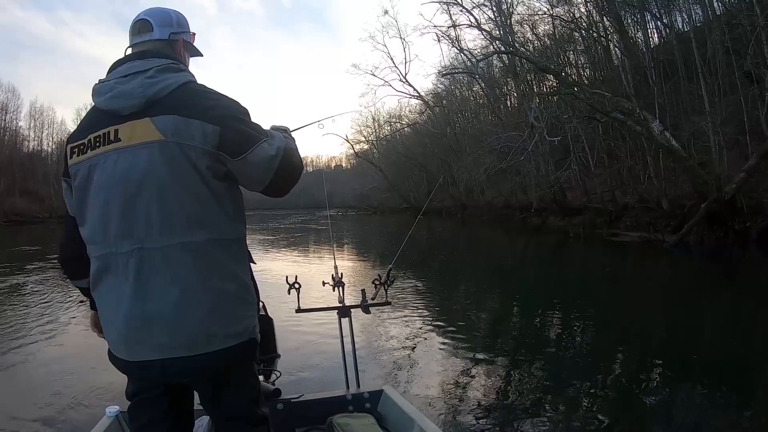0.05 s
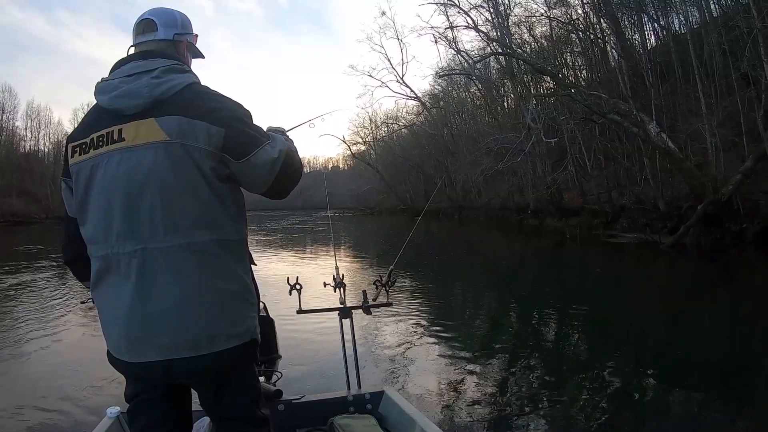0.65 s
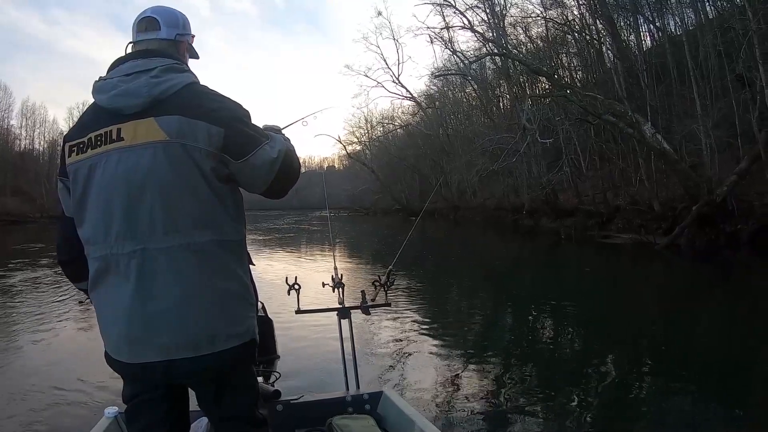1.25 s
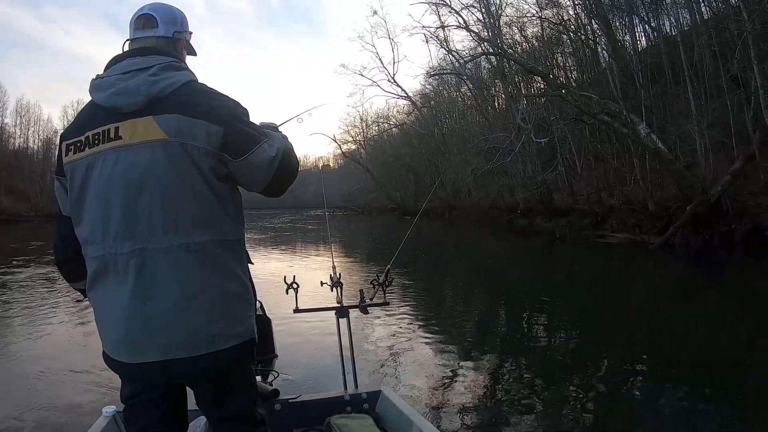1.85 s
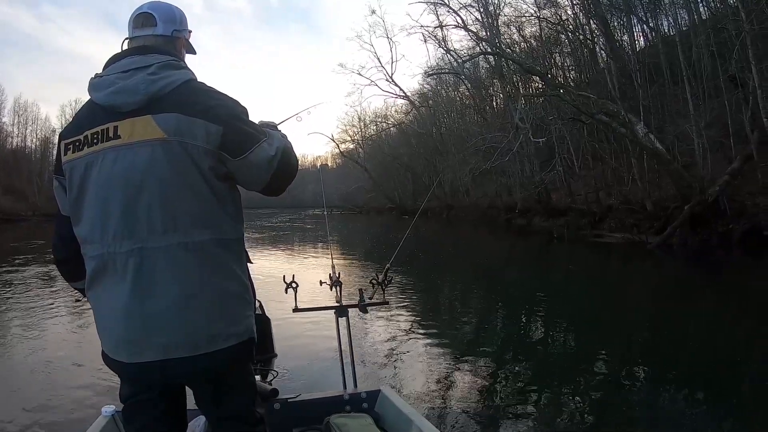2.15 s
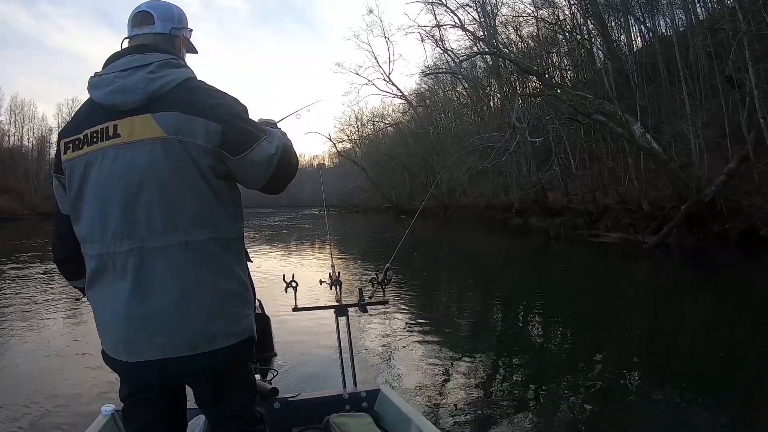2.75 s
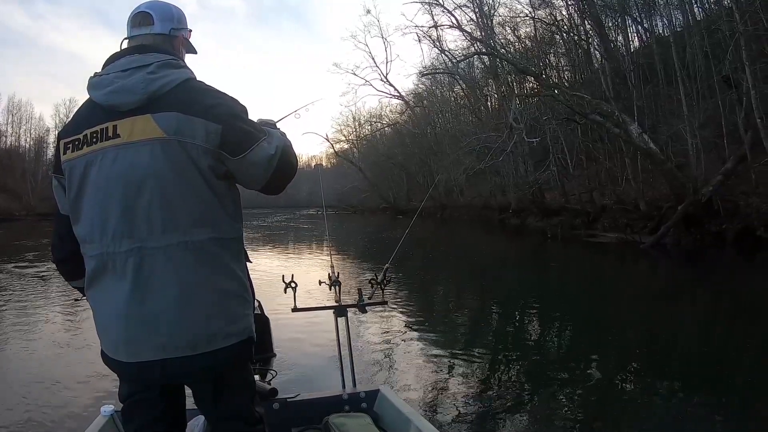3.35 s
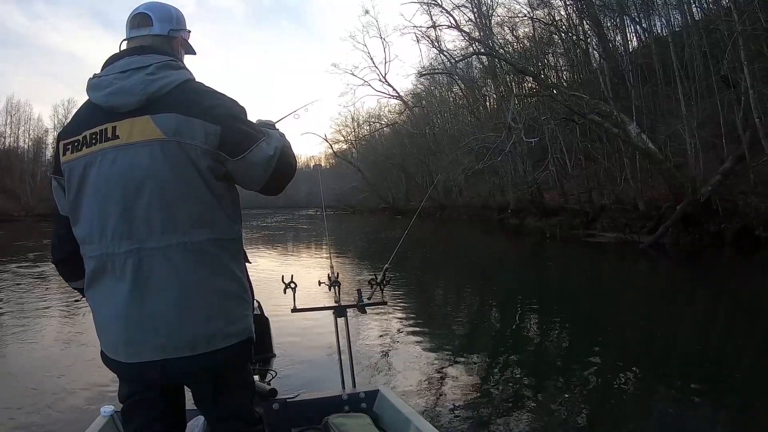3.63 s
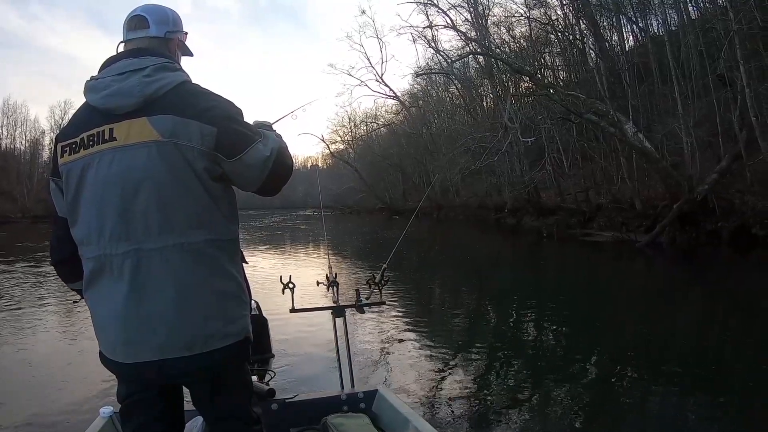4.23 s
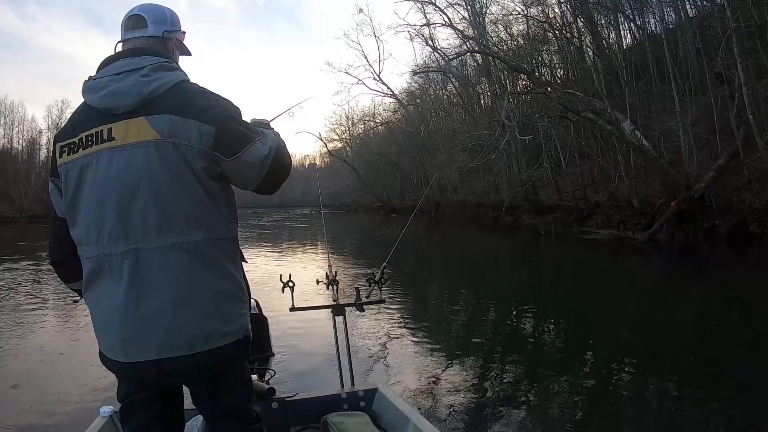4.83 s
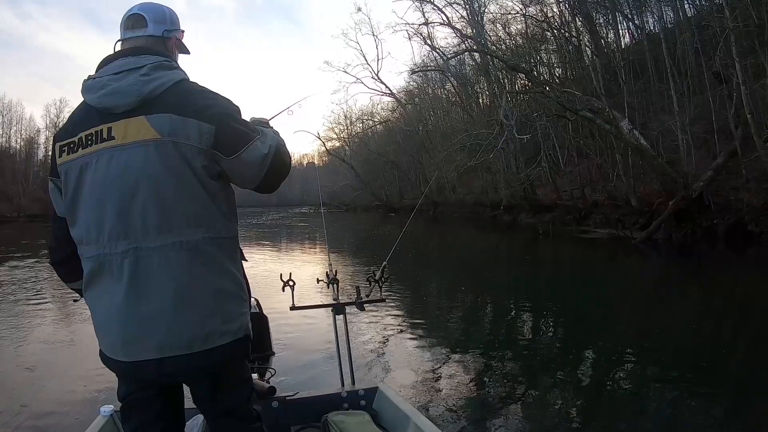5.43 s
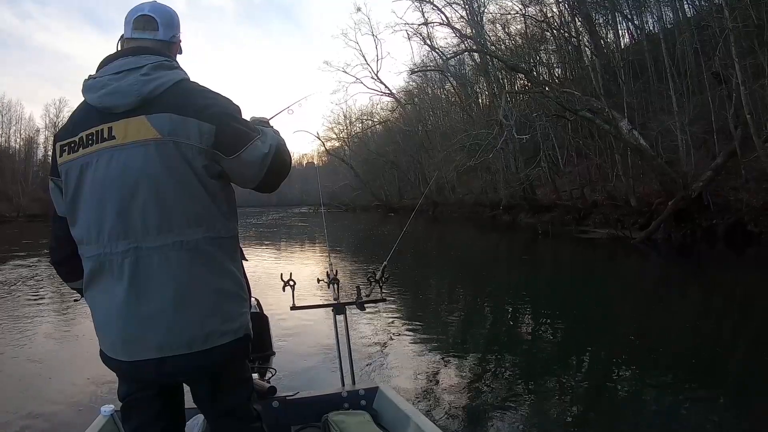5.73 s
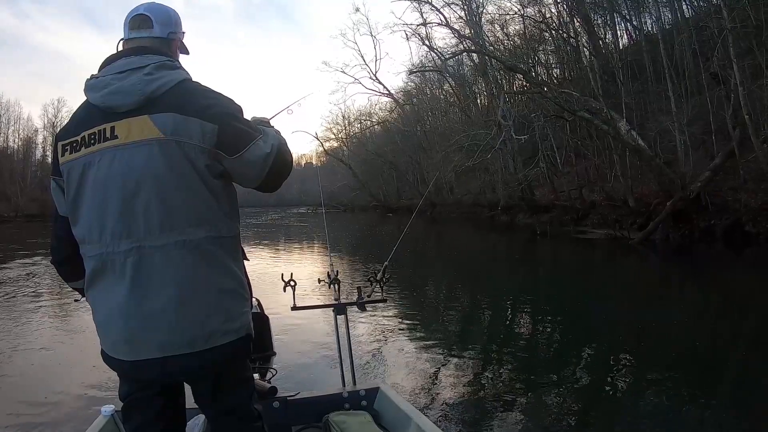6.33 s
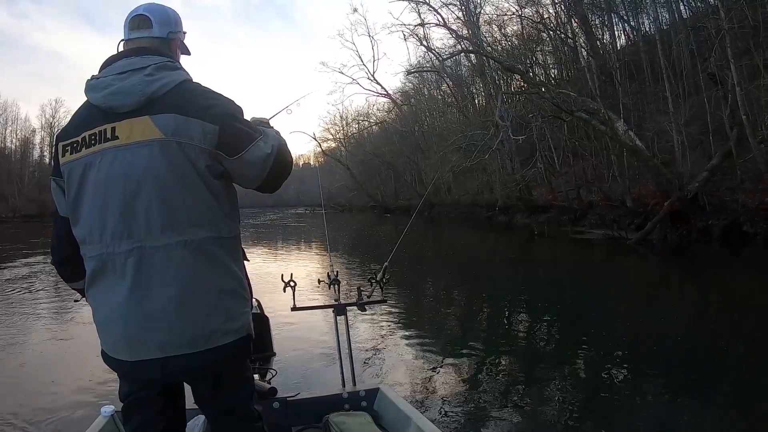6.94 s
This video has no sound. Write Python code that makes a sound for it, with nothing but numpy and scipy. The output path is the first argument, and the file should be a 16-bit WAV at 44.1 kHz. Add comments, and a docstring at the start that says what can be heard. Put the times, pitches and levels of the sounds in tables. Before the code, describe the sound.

Low wind gusts and buffets the microphone on a small boat while a calm river rushes softly. A far engine drones underneath throughout. Fishing line hisses faintly at the start, and small birds whistle, chip and trill from the banks, echoing in the woods. A few tiny bubbles and light dry ticks come close by, and one dull low thump lands near the end.

```python
"""Water rushes softly over a low, gusting wind: a small boat drifts on a calm wooded river.
Current, ripples and wind are shaped noise, and trapped bubbles ring beside the hull.
Small birds whistle, chip and trill on the banks in gliding tones that the bare woods echo.
An angler's line hisses through the rod rings; there are short, dry ticks and one dull low thump.
Underneath, a far engine drones on a few low harmonics of its firing rate."""
import sys
import numpy as np
from scipy import signal
from scipy.io import wavfile
from scipy.ndimage import uniform_filter1d

SR = 44100
rng = np.random.default_rng(int(sys.argv[2]) if len(sys.argv) > 2 else 0)


def wrap_up_sound(samples):
    """Save the sound to the file named by the first command line argument, as 16-bit audio."""
    columns = np.atleast_2d(samples).T
    # keep every value between -1 and 1, then stretch to whole-number steps
    tamed = np.clip(columns, -1, 1)
    steps = np.round(tamed * 32767).astype(np.int16)
    wavfile.write(sys.argv[1], SR, steps)


N = 316638
TIME = np.arange(N) / SR


# Tone of the current: freq_hz, density_db
RUSH_SPECTRUM = [(100, -8), (250, 3), (340, -0.5), (480, -1.5), (580, 0), (800, -2), (1000, -7),
                 (1300, -11.5), (1700, -20.5), (2100, -27), (2600, -37), (4000, -69), (8000, -67)]
# Its fader ride: time_s, level_db
RUSH_LEVEL = [(0, -52), (.8, -51.5), (1.6, -52), (2.4, -51), (3.2, -51.5), (4, -51.5), (4.8, -51),
              (5.3, -50.5), (5.8, -51), (6.5, -51.5), (7.18, -51)]
# Its treble lift: time_s, tilt_db_per_octave
RUSH_TILT = [(0, 1), (1, 0.5), (2, 0.1), (3, -0.5), (4, 1), (4.8, 1.5), (5.7, 2), (6.4, 2), (7.18, 1.5)]
# Tone of the ripples: freq_hz, density_db
RIPPLE_SPECTRUM = [(1500, -14), (2600, 7), (3300, 7.5), (4200, 4.5), (5700, 6), (6500, -1), (7400, -6),
                   (8400, -3), (9600, 0), (10500, -27), (11700, -29)]
# Their fader ride: time_s, level_db
RIPPLE_LEVEL = [(0, -75), (.9, -83.5), (1.32, -80), (1.8, -84.5), (2.4, -83.5), (3.4, -80.5), (5.1, -79.5),
                (5.75, -81.5), (6.5, -82), (7.18, -80)]

def river(rush_trim_db=3, ripple_trim_db=5, swell_db=.27):
    """The dull rush of the current and the fine hiss of ripples."""
    rush_db = at_time(RUSH_LEVEL)[0] + rush_trim_db + swell_db * drift(per_s=3)
    ripple_db = at_time(RIPPLE_LEVEL)[0] + ripple_trim_db
    rush = amp(rush_db) * wash(RUSH_SPECTRUM, tilt=RUSH_TILT)
    return rush + amp(ripple_db) * wash(RIPPLE_SPECTRUM, patchy_db=3, size=512)


# The clearest bubbles, dead centre: start_s, pitch_hz, level_db
PLOPS = [(1.468, 1720, -53), (3.145, 2290, -68), (5.043, 2580, -60)]

def bubbles(count=23, level_db=-67, low_hz=900, high_hz=3000, spread_db=8):
    """Now and then a ripple traps a small bubble beside the hull."""
    faint = []
    for when, pitch, loud, side in rng.random((count, 4)):
        hz = low_hz * (high_hz / low_hz) ** pitch
        faint.append((when * N / SR, hz, level_db + spread_db * (loud - pitch), side))
    out = np.zeros((2, N))
    for s, hz, db, side in faint + [(*row, .5) for row in PLOPS]:
        for channel, share in zip(out, (side, 1 - side)):
            add(channel, s, np.sqrt(share) * amp(db) * bubble(hz))
    return out


def bubble(hz, cycles=14):
    """A trapped bubble rings briefly and rises in pitch."""
    t = np.arange(SR // 12) / SR
    age = t * hz / cycles
    return np.exp(-age) * np.sin(2 * np.pi * hz * t * (1 + .02 * age))


# Tone of the wind's roar: freq_hz, density_db
ROAR_SPECTRUM = [(20, -24.5), (45, -15.5), (68, 4), (92, 4), (110, 0), (125, -3.5), (150, -2), (185, -7.5),
                 (235, -13), (320, -19.5), (600, -78)]
# Strength of the breeze: time_s, level_db
ROAR_LEVEL = [(0, -44.5), (.8, -42.5), (1.2, -43), (2.2, -43.5), (2.8, -40.5), (3.3, -44.5), (4.6, -44),
              (5.2, -42), (6.1, -44), (7.18, -44.5)]
# Puffs (+) and lulls (-): centre_s, half_length_s, lift_db
PUFFS = [(0.05, 0.044, 5.5), (.25, .04, -2), (.46, 0.029, 7), (0.855, 0.028, -6), (1.18, .06, 3),
         (1.732, .04, 8), (2.417, 0.048, -3.5), (2.697, 0.035, 5), (2.847, 0.045, -4.5), (3.48, 0.033, -11),
         (3.874, 0.12, 1.5), (4.19, 0.051, -2), (4.32, 0.044, 3.5), (6.102, 0.027, 3.5),
         (6.253, 0.044, -15), (6.74, .035, 7), (6.825, 0.037, -6), (6.96, 0.059, -9), (7.11, 0.035, 0)]
# Deep buffeting on the microphone: freq_hz, density_db
BUFFET_SPECTRUM = [(5, -25), (15, -4), (25, 5.5), (45, 1.5), (60, 1), (90, -25), (200, -80)]
# Its gusts: time_s, level_db
BUFFET_LEVEL = [(0, -59), (.27, -47), (.65, -53.5), (1.4, -49.5), (1.85, -53), (2.05, -57), (2.25, -49),
                (2.85, -51), (3.27, -44), (3.5, -47), (4.02, -43), (4.2, -56), (4.55, -49), (5.1, -44.5),
                (5.65, -49), (6.1, -44), (6.25, -56), (6.75, -42.5), (6.95, -52), (7.12, -40.5)]
# A hollow band above the roar: freq_hz, density_db
HOLLOW_SPECTRUM = [(120, -44.5), (155, 5), (174, 9.5), (198, 2), (218, -18.5), (260, -50.5)]
# Its fader ride: time_s, level_db
HOLLOW_LEVEL = [(0, -58), (.4, -54.5), (1.0, -50.5), (1.25, -54), (1.6, -51.5), (2.5, -56), (3.2, -53.5),
                (3.9, -58.5), (4.3, -54.5), (4.6, -48), (4.77, -52.5), (4.93, -47.5), (5.25, -55.5),
                (5.6, -53), (5.9, -51), (6.45, -50.5), (6.7, -55.5), (6.95, -48.5), (7.18, -54)]

def wind(swell_db=.5):
    """A low roar swells and puffs with the breeze, between deep buffeting and a hollow upper band."""
    puff_db = sum(db * np.exp(-((TIME - s) / width) ** 2) for s, width, db in PUFFS)
    roar_db = at_time(ROAR_LEVEL)[0] + puff_db + swell_db * drift(per_s=5.1)
    roar = amp(roar_db) * wash(ROAR_SPECTRUM, size=4096)
    buffet = amp(at_time(BUFFET_LEVEL)[0]) * wash(BUFFET_SPECTRUM, size=4096)
    hollow = amp(at_time(HOLLOW_LEVEL)[0]) * wash(HOLLOW_SPECTRUM, size=4096)
    return roar + buffet + hollow


# The whistler's pickup notes: start_s, length_s, first_hz, last_hz, level_db, rasp_share
OPENERS = [(0.021, 0.027, 3900, 3990, -63.5, 0.15), (2.7, .012, 3350, 3430, -71, .1),
           (2.721, 0.012, 3710, 3750, -65, 0), (2.737, 0.015, 3850, 3840, -68, 0.08),
           (5.592, 0.05, 2740, 2600, -71, 0.4), (5.603, .017, 5680, 4190, -72, 0.2),
           (5.612, 0.01, 4440, 5170, -73, .2), (5.621, 0.016, 3870, 4600, -69.5, 0.3),
           (5.638, 0.027, 3810, 3300, -64, .2)]
# Its falling slurs: start_s, length_s, first_hz, level_db, rasp_share, break_db
SLURS = [(.064, .094, 3830, -64.5, .15, -4), (2.769, 0.084, 3853, -62.5, 0.15, -5),
         (5.657, .104, 3950, -62, .08, -4)]
# It turns towards the boat: time_s, direct_lift_db
FACING = [(.1, -2), (2.8, 0), (5.6, 3.5)]

def whistler(fall_hz_per_s=12200, bow_hz=70, opener_direct_db=-1.5):
    """Short notes lead into a bowed slur that breaks and fades as it falls; the woods ring on."""
    openers = bird([(s, arc(length, first, last), db, rasp)
                    for s, length, first, last, db, rasp in OPENERS], soft=.52)
    slurs = np.zeros(N)
    for s, length, hz, db, rasp, break_db in SLURS:
        fall_hz = fall_hz_per_s * length
        path = arc(length, hz, hz - fall_hz / 2 + bow_hz, hz - fall_hz)
        slurs += bird([(s, path, db, rasp)], soft=.5, fade_db=-4.5, break_db=break_db)
    song = openers + slurs
    straight = (amp(opener_direct_db) * openers + slurs) * amp(at_time(FACING)[0])
    early = direct(straight, pan_db=2.5, same=1, lag=1) + trunks(song)
    tail = amp(2) * echoes(song, t60=1.55, same=.74, rise=.037)
    return early + placed(tail, pan_db=-2)


# Sharp upward flicks: start_s, middle_hz, level_db
FLICKS = [(.625, 4700, -66.5), (.628, 6380, -71), (1.388, 4580, -68), (1.39, 6050, -74), (2.771, 4590, -69),
          (3.694, 6200, -68), (4.941, 6170, -71), (5.147, 6220, -68), (7.047, 4500, -67),
          (7.049, 6050, -71)]
# The short notes that follow: start_s, length_s, pitch_hz, level_db, drop_level_db
PIPS = [(.636, .013, 3330, -66.5, -71), (1.399, 0.023, 3690, -67.5, -75), (3.704, 0.021, 3490, -63.5, -79),
        (4.96, 0.014, 3390, -71.5, -78), (5.156, .023, 3630, -64.5, -73), (7.06, 0.01, 3440, -67, -77)]

def chirrups(flick_s=.009, sweep=.11, sag=.07, drop_s=.015, drop_share=.3):
    """A flick or two, then a short arched note that ends in a steep drop."""
    flicks = [(s, hz * arc(flick_s, 1 - sweep / 2, 1 + sweep / 2), db, .15) for s, hz, db in FLICKS]
    pips = [(s, hz * arc(length, 1 - sag, 1, 1 - sag / 2), db, .22) for s, length, hz, db, _ in PIPS]
    drops = [(s + length, hz * arc(drop_s, 1 - sag / 2, 1 - drop_share), db, .2)
             for s, length, hz, _, db in PIPS]
    return bird(flicks + pips + drops, soft=.4)


# Thin rising calls: start_s, length_s, first_hz, top_hz, bend, level_db, swell_db
TSIPS = [(0.564, .034, 6900, 8050, 2, -73.5, 0), (.693, 0.054, 6600, 7370, 0.5, -76, 5),
         (1.689, .04, 6400, 8050, 3, -73.5, -2), (2.172, .035, 6460, 8100, 2.5, -80, -1),
         (2.33, .055, 6900, 7250, 8, -76, -4), (2.902, 0.04, 7300, 7900, 4.5, -72.5, 1),
         (3.634, 0.066, 7100, 8340, -1.5, -76, 3), (4.294, 0.034, 6300, 7970, 3.5, -56.5, 14),
         (5.888, 0.034, 5600, 7800, 3.5, -53.5, -5.5), (7.085, .04, 6850, 7850, 7, -89, -7)]

def tsips(rasp=.16):
    """High calls that shoot upward, swelling or fading as they go."""
    return sum(bird([(s, settle(length, first, top, bend), db, rasp)], soft=.17, fade_db=swell_db)
               for s, length, first, top, bend, db, swell_db in TSIPS)


# Falling calls: start_s, length_s, level_db
CHIPS = [(3.176, 0.023, -66), (4.86, .033, -76), (5.359, 0.023, -68), (5.407, .075, -76),
         (5.488, 0.074, -77), (5.701, 0.027, -69.5), (6.074, 0.036, -74), (6.506, 0.026, -66),
         (6.896, .023, -71)]

def chips(first_hz=9300, last_hz=7250, bend=3.9, rasp=.18):
    """High calls that all drop onto the same pitch."""
    notes = [(s, settle(length, first_hz, last_hz, bend), db, rasp) for s, length, db in CHIPS]
    return bird(notes, soft=.44)


# Contour of a thin trill: time_s, top_hz, foot_hz, level_db
TRILL = [(2.0, 6070, 5300, -80), (2.3, 6760, 5710, -75.5), (2.55, 6850, 5800, -76.5),
         (2.97, 6800, 5800, -73), (3.2, 6550, 5400, -75), (3.37, 6320, 5100, -73.5),
         (3.58, 5970, 5000, -86)]

def trill(start_s=2.01, count=17, length_s=.04, gap_s=.1105, hurry=.346, uneven_db=1.3, stray=.008):
    """Arched notes, uneven in strength, come ever faster while the phrase climbs and then sinks."""
    gaps = gap_s * (1 - hurry * ((np.arange(count - 1) + .5) / (count - 1)) ** 2)
    starts = start_s + np.append(0, np.cumsum(gaps))
    notes = []
    for s, top, foot, db in zip(starts, *at_time(TRILL, starts)):
        stress, detune = rng.standard_normal(2)
        path = (1 + stray * detune) * arc(length_s, foot, top, foot)
        notes.append((s, path, db + uneven_db * stress, .17))
    return bird(notes, soft=.17)


# Contour of a far bird's rattling song: time_s, pitch_hz, level_db
RATTLE = [(3.225, 3890, -74), (3.5, 3856, -73), (3.78, 3820, -74), (4.02, 3810, -71.5), (4.13, 3780, -75)]

def rattle(per_s=15.5, length_s=.0367, drop_share=.08, swell_db=3, uneven_db=1.2, stray=.012):
    """One short note that drops onto its pitch, repeated fast with uneven strength."""
    starts = np.arange(RATTLE[0][0], RATTLE[-1][0], 1 / per_s)
    notes = []
    for s, hz, db in zip(starts, *at_time(RATTLE, starts)):
        stress, detune = rng.standard_normal(2)
        path = (1 + stray * detune) * settle(length_s, hz * (1 + drop_share), hz, bend=2.5)
        notes.append((s, path, db + uneven_db * stress, .22))
    return bird(notes, soft=.41, fade_db=swell_db)


def bird(notes, soft, fade_db=0, break_db=0, break_at=.32, break_width=.1):
    """Sings notes (start_s, path_hz, level_db, rasp) as gliding tones; rasp shakes pitch and level."""
    song = np.zeros(N)
    for s, path, db, rasp in notes:
        count = len(path)
        hz = path * (1 + .1 * rasp * jitter(count))
        age = np.linspace(0, 1, count)
        shape_db = fade_db * age + break_db * np.exp(-((age - break_at) / break_width) ** 2)
        envelope = signal.windows.tukey(count, soft) * unit((1 + rasp * jitter(count)) * amp(shape_db))
        add(song, s, np.sqrt(2) * amp(db) * envelope * np.sin(2 * np.pi * np.cumsum(hz) / SR))
    return song


def birds():
    """The farther the bird, the more of its sound is echo; the high voices sit to the right."""
    return (whistler()
            + woods(chirrups(), trim_db=0, pan_db=-4, echo_pan_db=0, wet_db=-7.5, t60=.34, same=.68)
            + woods(tsips(), trim_db=-.5, pan_db=-4, echo_pan_db=-8, wet_db=-6.5, t60=.37,
                    rise=.018, lag=2)
            + woods(chips(), trim_db=-4, pan_db=-9, echo_pan_db=-2, wet_db=-6, t60=.37, lag=2)
            + woods(trill(), trim_db=-6, pan_db=-15, echo_pan_db=-10, wet_db=-3.5, t60=.86, lag=2)
            + woods(rattle(), trim_db=-3, pan_db=-3, echo_pan_db=-5.5, wet_db=0, t60=.5, same=.8))


# Short, dry ticks and chips: start_s, level_db
TICKS = [(1.156, -68), (1.276, -69), (1.295, -61), (1.89, -65.5), (2.087, -66.5), (2.985, -61),
         (3.031, -66), (4.656, -64), (5.241, -60), (6.38, -68)]
# Their ring, played a little flat each time: pitch_hz, level_db, t60_s
TICK_MODES = [(2900, -7, .007), (3700, -6, .007), (4650, 0, .009), (5400, -2, .007), (6400, -7, .006)]

def dry_ticks(scrape_s=.0022, pan_db=-5):
    """Short, dry ticks and chips near 4-5 kHz: a tiny noise burst rings a few fast-dying modes."""
    t, ticks = np.arange(SR // 20) / SR, np.zeros(N)
    for s, db in TICKS:
        ring = sum(amp(mode_db - 60 * t / t60) * np.sin(2 * np.pi * hz * rng.uniform(.94, .98) * t)
                   for hz, mode_db, t60 in TICK_MODES)
        scrape = rng.standard_normal(len(t)) * np.exp(-t / scrape_s)
        add(ticks, s, amp(db) * signal.fftconvolve(ring, scrape / np.linalg.norm(scrape)))
    return placed(ticks, pan_db)


# Tone of the sliding line: freq_hz, density_db
LINE_SPECTRUM = [(2500, -21), (4500, 9), (6000, -4.5), (7400, -14.5), (8600, 5), (9400, 8.5), (10200, -5),
                 (11500, -14)]
# Two pulls: time_s, level_db
LINE_PULLS = [(0, -81), (.2, -74), (.27, -80), (.33, -94), (.42, -82), (.56, -81), (.7, -91), (.9, -120)]

def fishing_line():
    """The line hisses as it slides through the rod rings."""
    return amp(at_time(LINE_PULLS)[0]) * wash(LINE_SPECTRUM, size=512)


def low_bump(centre_s=6.734, pitch_hz=80, half_length_s=.007, level_db=-30, pan_db=-3):
    """One short, dull low thump near 80 Hz, little more than a cycle long."""
    t = TIME - centre_s
    envelope = amp(level_db) * np.exp(-(t / half_length_s) ** 2)
    return placed(envelope * np.cos(2 * np.pi * pitch_hz * t), pan_db)


# Speed of the far engine: time_s, firing_hz
ENGINE_RATE = [(0, 34.3), (1.4, 34.1), (3.9, 34.1), (5.45, 33.9), (5.8, 33.25), (6.6, 32.95), (7.18, 32.65)]
# How its harmonics carry over the water: time_s, third_db, fourth_db, sixth_db
ENGINE_HARMONICS = [(0, -42.5, -49, -70), (.25, -49.5, -48.5, -59), (.45, -46, -52, -59),
                    (0.779, -51, -57.5, -54), (1.0, -40, -48, -48.5), (1.45, -44, -45, -57),
                    (1.72, -39.5, -40.5, -63), (1.87, -43, -44, -62), (2.05, -41, -44.5, -56.5),
                    (2.7, -40.5, -49, -66), (2.86, -47, -45, -62), (3.0, -41.5, -44, -55),
                    (3.5, -61, -49.5, -59), (3.8, -38.5, -48.5, -74), (4.15, -54.5, -55, -55),
                    (4.35, -45, -57, -55), (4.9, -54.5, -56, -58), (5.45, -48, -65, -64),
                    (5.7, -54.5, -50.5, -62), (5.92, -50, -41, -57), (6.25, -49.5, -48, -55),
                    (6.68, -40, -46.5, -59), (6.95, -75, -60, -47), (7.18, -60, -49, -48.5)]

def engine(seventh_db=-63, trim_db=-1, waver=.19, pan_db=-3):
    """Only a few low harmonics of the firing rate carry this far; moving air makes them waver."""
    firing_phase = 2 * np.pi * np.cumsum(at_time(ENGINE_RATE)[0]) / SR
    drone = np.zeros(N)
    for harmonic, db in zip((3, 4, 6, 7), at_time(ENGINE_HARMONICS) + [seventh_db]):
        phase = harmonic * firing_phase + 2 * np.pi * rng.random() + waver * drift(per_s=6.5)
        drone += np.sqrt(2) * amp(db + trim_db) * (1 + waver * drift(per_s=6.5)) * np.sin(phase)
    return placed(drone, pan_db)


def woods(x, trim_db, pan_db, echo_pan_db, wet_db, t60, same=0, rise=.017, lag=1):
    """The direct sound and the long echo of the trees."""
    straight = direct(x, pan_db, same, lag)
    tail = placed(amp(wet_db) * echoes(x, t60, same, rise), echo_pan_db)
    return amp(trim_db) * (straight + tail)


def direct(x, pan_db, same, lag):
    """The straight path, lag samples later on the right, with a short blur from twigs."""
    blur = echoes(x, t60=.07, same=same, rise=.001)
    return placed(.85 * np.array([x, np.roll(x, lag)]) + .5 * blur, pan_db)


# Slapback from big trunks: delay_s, level_db
TRUNK_ECHOES = [(.056, -8), (.11, -7), (.205, -10)]

def trunks(x, pan_db=-1):
    """A few stands of big trunks throw back separate bursts of echo, each smeared in its own way."""
    out = np.zeros((2, N))
    for delay, db in TRUNK_ECHOES:
        for channel, burst in zip(out, echoes(x, t60=.15, same=.9, rise=.008)):
            add(channel, delay, amp(db) * burst)
    return placed(out, pan_db)


def echoes(x, t60, same, rise):
    """Sparse reflections, clumped by the trunks, build and die away; same is left-right likeness."""
    t = np.arange(SR) / SR
    taps = rng.standard_normal((2, SR)) * (rng.random(SR) < .1)
    taps *= amp(1.3 * drift(per_s=110)[:SR])
    taps[1] = same * taps[0] + np.sqrt(1 - same ** 2) * taps[1]
    envelope = amp(-60 * t / t60) * (1 - np.exp(-(t / rise) ** 2))
    tail = (taps * envelope)[:, :int(t60 * SR)]
    tail /= np.linalg.norm(tail, axis=1, keepdims=True)
    return signal.oaconvolve(x[None], tail, axes=1)[:, :N]


# How alike the two sides of the noise beds are: freq_hz, likeness_share
STEREO_LIKENESS = [(30, .985), (120, .997), (300, .975), (500, .88), (750, .77), (1000, .78), (1280, .68),
                   (1480, .4), (2200, .33), (3300, .55), (4500, .55), (5500, .15), (11000, .12)]
# Their phase offset: freq_hz, left_lead_rad
STEREO_LEAD = [(40, -.15), (300, -.05), (460, .2), (560, .85), (800, 1.4), (1400, 1.4), (2100, .1),
               (3300, .5), (5000, .5), (6200, 2)]
# Their balance: freq_hz, left_minus_right_db
STEREO_BALANCE = [(30, -2), (100, -3), (220, -4), (340, -6.5), (500, -9.5), (700, -6), (980, 0), (1400, 2),
                  (2600, 0), (3600, -1), (4700, -5), (6000, -9), (10000, -6)]

def wash(spectrum, patchy_db=1, tilt=None, size=1024):
    """A stereo bed of shaped noise with drifting patches; rms 1."""
    hop = size // 4
    hz, t = np.fft.rfftfreq(size, 1 / SR), np.arange(N // hop + 5) * hop / SR
    a, b, c, d, patches = rng.standard_normal((5, len(t), len(hz)))
    left, unrelated = a + 1j * b, c + 1j * d
    same = at_hz(STEREO_LIKENESS, hz)
    right = (same * left + np.sqrt(1 - same ** 2) * unrelated) * np.exp(-1j * at_hz(STEREO_LEAD, hz))
    lean = amp(at_hz(STEREO_BALANCE, hz) / 2)
    patches = uniform_filter1d(uniform_filter1d(patches, size=10, axis=0), size=12, axis=1)
    field_db = at_hz(spectrum, hz) + patchy_db * unit(patches)
    if tilt is not None:
        field_db += at_time(tilt, t)[0][:, None] * np.log2(np.clip(hz / 600, 1, 5))
    frames = np.array([left * lean, right / lean]) * amp(field_db)
    _, noise = signal.istft(frames.transpose(0, 2, 1), nperseg=size, noverlap=size - hop)
    return unit(noise[:, :N])


def arc(length, *hz):
    """A pitch that passes smoothly through two or three values."""
    return np.polyval(np.polyfit(np.linspace(0, 1, len(hz)), hz, len(hz) - 1), progress(length))


def settle(length, first_hz, last_hz, bend):
    """A glide that starts fast and levels out; a negative bend speeds up instead."""
    return first_hz + (last_hz - first_hz) * np.expm1(-bend * progress(length)) / np.expm1(-bend)


def progress(length):
    """Runs from 0 to 1 over a note."""
    return np.linspace(0, 1, int(length * SR))


def jitter(length, size=40):
    """Random wobble on a scale of about a millisecond; rms near 1."""
    return unit(uniform_filter1d(uniform_filter1d(rng.standard_normal(SR // 4), size), size))[:length]


def drift(per_s):
    """Smooth random wandering; rms 1."""
    return unit(signal.resample(rng.standard_normal(max(int(2 * per_s * N / SR), 2)), N))


def at_hz(points, hz):
    """Reads a spectrum on a log-frequency axis."""
    f, value = np.transpose(points)
    return np.interp(np.log(hz + 1), np.log(f + 1), value)


def at_time(rows, t=TIME):
    """Reads every column of a curve."""
    s, *columns = np.transpose(rows)
    return [np.interp(t, s, c) for c in columns]


def add(mix, s, sound):
    """Mixes a sound in at time s."""
    part = mix[max(round(s * SR), 0):][:len(sound)]
    part += sound[:len(part)]


def placed(x, pan_db):
    """Pans a sound left (+) or right (-)."""
    return x * amp(np.array([[pan_db], [-pan_db]]) / 2)


def amp(db):
    """Decibels to gain."""
    return 10 ** (np.asarray(db) / 20)


def unit(x):
    """Scales to rms 1."""
    return x / np.sqrt(np.mean(x ** 2) + 1e-20)


def scene():
    """Everything heard from the boat."""
    return wind() + river() + bubbles() + engine() + birds() + dry_ticks() + fishing_line() + low_bump()


def record(dry):
    """A steep high cut at 11.5 kHz on the whole mix."""
    lowpass = signal.firwin(255, 11500, window=("kaiser", 8), fs=SR)
    return signal.oaconvolve(dry, lowpass[None], "same")


dry = scene()
out = record(dry)
wrap_up_sound(out)
```